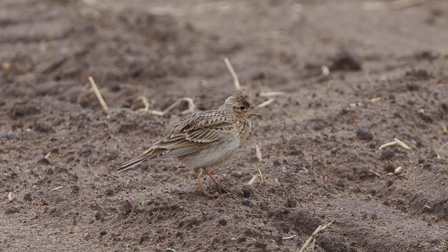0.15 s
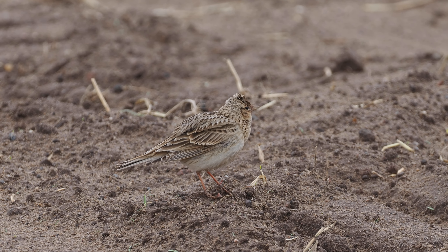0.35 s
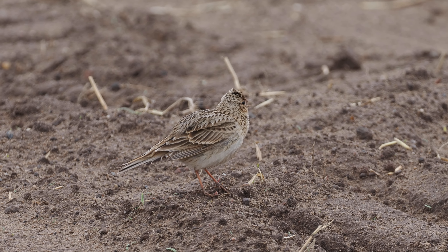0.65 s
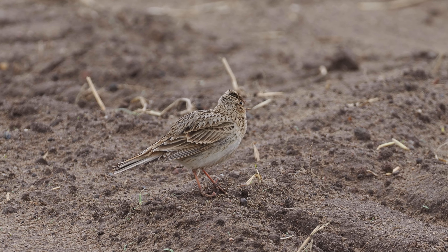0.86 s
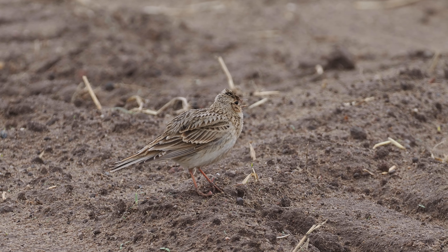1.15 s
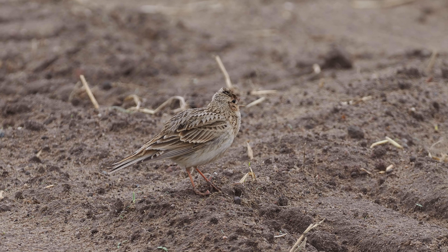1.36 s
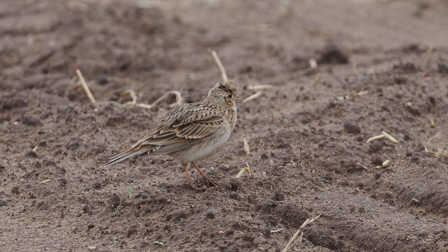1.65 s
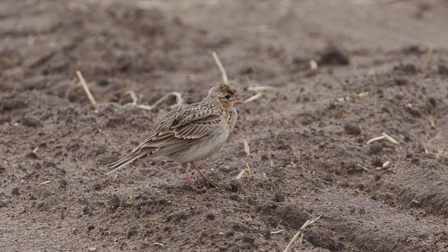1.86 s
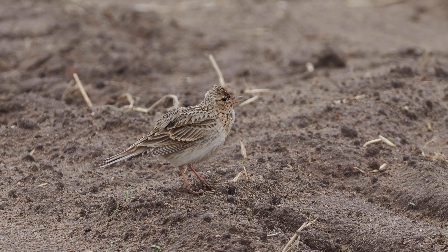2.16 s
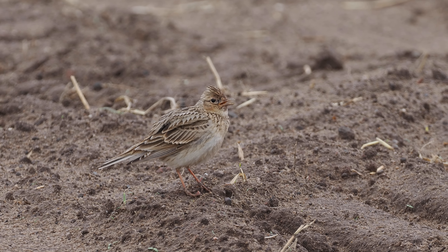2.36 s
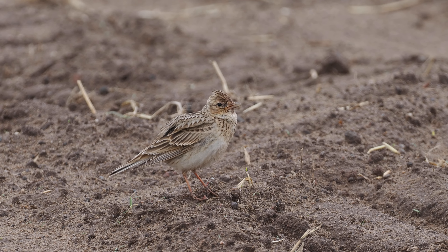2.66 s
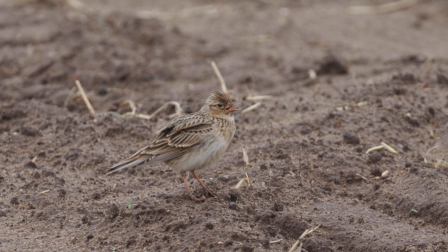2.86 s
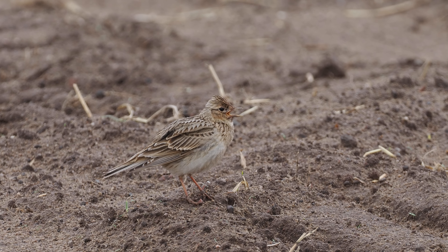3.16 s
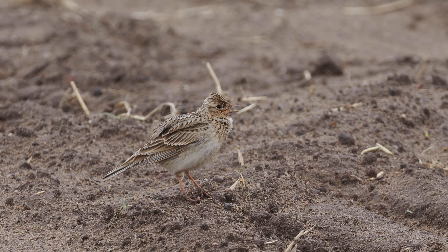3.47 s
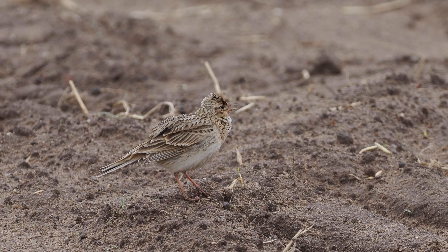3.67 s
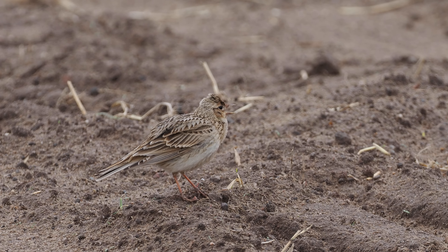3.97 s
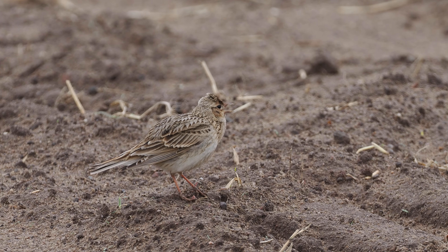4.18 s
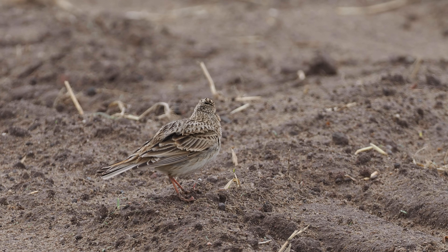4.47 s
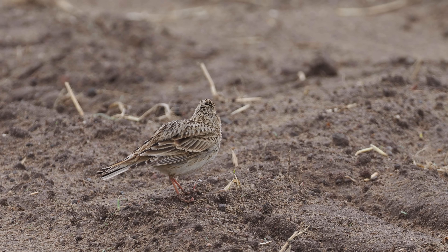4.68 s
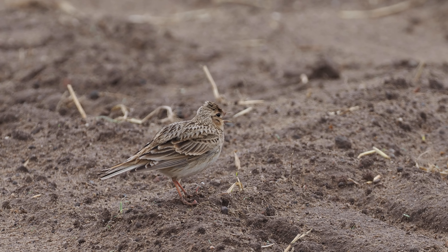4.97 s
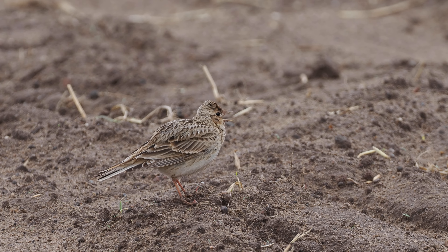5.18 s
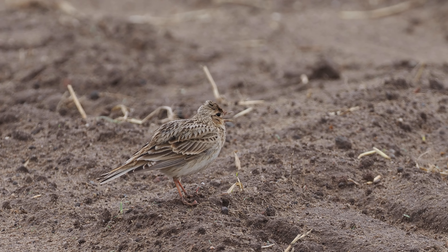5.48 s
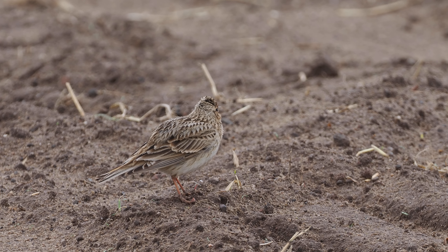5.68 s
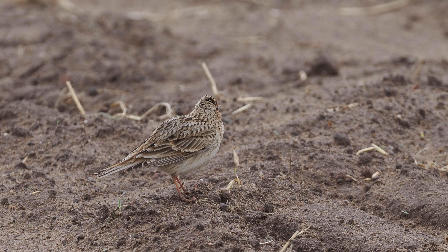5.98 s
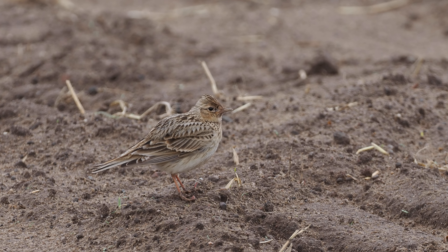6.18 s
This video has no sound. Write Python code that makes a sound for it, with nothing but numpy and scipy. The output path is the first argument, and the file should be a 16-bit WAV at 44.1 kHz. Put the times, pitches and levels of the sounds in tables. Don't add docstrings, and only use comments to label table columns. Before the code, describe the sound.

A gust rumbles as a thin whistle slides down, then a skylark chatters almost without pause: trills, stepped chirps, churrs, harsh buzzes, swooping notes and repeated sweet whistles. The bird is central and fairly dry, with only a faint short ground echo. Uneven low wind bumps hit mainly the right side, a far machine-like roar lies below, and the last moments are wind alone.

```python
import sys
import numpy as np
from scipy import signal
from scipy.fft import rfft, irfft
from scipy.io import wavfile
from scipy.ndimage import uniform_filter1d

SR = 44100
rng = np.random.default_rng(int(sys.argv[2]) if len(sys.argv) > 2 else 0)


def amplitude_ratio(level_db):
    exponent = np.asarray(level_db, float) / 20
    return 10 ** exponent


def generate_wav(sig):
    pcm = np.round(np.clip(np.atleast_2d(sig).T, -1, 1) * 32767).astype(np.int16)
    wavfile.write(sys.argv[1], SR, pcm)


N = 279148

# (frequency [Hz], gain [dB])
BREATH_GAIN = [(3000, -47), (5200, -36), (6400, -31.5), (7300, -6.5), (8000, -8), (8800, -36.5),
               (10500, -30.5), (15000, -42.5)]


def lark():
    calls = glides() + trill() + hooks() + slide() + stepped_calls() + churrs() + dips() + buzzes()
    calls += swoops() + arches() + single_notes() + waves()
    song = np.zeros(N, complex)
    for s, sound in calls:
        add(song, s, sound)
    gain = amplitude_ratio(read(BREATH_GAIN, np.fft.rfftfreq(N, 1 / SR)))
    return song.real + irfft(rfft(song.imag) * gain, N)


# (frequency [Hz], gain [dB])
BEAK_GAIN = [(5000, -19.5), (6200, -33), (7400, -17.5), (8000, -22.5), (8700, -52.5), (9600, -38.5),
             (12000, -29.5), (15000, -35.5)]


def syrinx(hz, third_db=-12, under_db=-42, breath_db=-12):
    haste = np.clip(abs(np.gradient(hz)) * SR / 60000, .03, 1)
    rasp, rasp_ms = 0.019, 0.85
    wobble = evened(uniform_filter1d(rng.standard_normal(len(hz)), size=round(rasp_ms * SR / 1000)))
    phase = 2 * np.pi * (np.cumsum(hz * (1 + rasp * haste * wobble)) / SR + rng.random())
    second = amplitude_ratio(read(BEAK_GAIN, 2 * hz)) * np.sin(2 * phase)
    third = amplitude_ratio(read(BEAK_GAIN, 3 * hz) + third_db) * (3 * hz < SR / 2) * np.sin(3 * phase)
    under_third = amplitude_ratio(read(BEAK_GAIN, 3 * hz / 2) + 12.5) * np.sin(3 * phase / 2)
    under = amplitude_ratio(under_db) * (np.sin(phase / 2) + under_third)
    breath = amplitude_ratio(breath_db) * haste * rng.standard_normal(len(hz))
    return np.sin(phase) + second + third + under + 1j * breath


def note(s, ms, in_hz, out_hz, db, under_db=-42, breath_db=-12, edge_ms=7, soft=0.82):
    edge = min(soft * ms, edge_ms)
    t = np.arange(-edge / 3, ms + edge / 3, 1000 / SR)
    rise = np.clip(np.minimum(t - t[0], t[-1] - t) / edge, 0, 1)
    hz = in_hz + (out_hz - in_hz) * np.clip(t / ms, -.15, 1.15)
    voice = syrinx(hz, under_db=under_db, breath_db=breath_db)
    return s - edge / 3000, amplitude_ratio(db) * np.sin(np.pi / 2 * rise) ** 2 * voice


def figure(s, hz, db, shape, under_db=-42, breath_db=-10, edge_ms=7):
    out = np.zeros(5500, complex)
    lead = .015
    for ms, length, enter, leave, rel_db in shape:
        below_db = under_db if 1.7 < enter + leave < 2.5 else -42
        level = db + rel_db + rng.normal(0, 1.0)
        add(out, *note(ms / 1000 + lead, length, enter * hz, leave * hz, level, below_db, breath_db, edge_ms))
    return s - lead, out


def fluttered(s, hz, db, depth, rate_hz, swing, wobble):
    t = np.arange(s[0], s[-1], 1 / SR)
    hz, db, depth, swing = (np.interp(t, s, c + 0 * s) for c in (hz, db, np.clip(depth, 0, 1), swing))
    drift = evened(uniform_filter1d(rng.standard_normal(len(t)), size=150))
    beat = 2 * np.pi * np.cumsum(rate_hz * (1 + wobble * (1 - depth) * drift)) / SR
    flow = (1 + depth * np.cos(beat)) / np.sqrt(1 + depth ** 2 / 2)
    begun = .004 * (s[0] == 0)
    ends = np.clip(np.minimum(t + begun - t[0], t[-1] - t) / 0.0024, 0, 1)
    voice = syrinx(hz * (1 + swing * (1 - 0.89 * depth) * np.sin(beat)), under_db=-45, breath_db=-19.0)
    return s[0], np.sqrt(2) * amplitude_ratio(db) * flow * ends * voice


def stroke(s, ms, hz, db):
    t = np.arange(ms[0], ms[-1], 1000 / SR)
    hz, db = (uniform_filter1d(np.interp(t, ms, c), size=40) for c in (hz, db))
    return s + ms[0] / 1000, amplitude_ratio(db) * signal.windows.tukey(len(t), .15) * syrinx(hz)


def run_of(s, gap_ms, first_db, last_db, count):
    return zip(s + np.arange(count) * gap_ms / 1000, np.linspace(first_db, last_db, count))


# (time [s], pitch [Hz], rms level [dB])
GLIDE_COURSES = [
    [(0, 4884, -26), (.022, 4860, -24.5), (.046, 4650, -26.5), (.074, 4450, -31.5), (.126, 4259, -33),
     (.154, 4180, -38.5), (.26, 3942, -40), (.335, 3796, -53)],
    [(4.665, 3097, -58), (4.68, 3040, -49), (4.695, 3120, -56), (4.713, 3174, -39), (4.749, 3930, -50),
     (4.775, 4315, -28.5), (4.79, 4200, -34)],
    [(5.047, 5516, -29), (5.077, 5560, -30.5), (5.095, 5810, -35), (5.111, 6110, -35), (5.125, 5900, -58)],
]
GLIDE_FLUTTER = [.01, 0.1, 0.074]


def glides():
    calls = [note(4.788, 13.0, 4250, 3200, -35)]
    for rows, depth in zip(GLIDE_COURSES, GLIDE_FLUTTER):
        s, hz, db = np.transpose(rows)
        calls.append(fluttered(s, hz, db, depth + 0 * s, rate_hz=220, swing=0.046 * depth, wobble=0.27))
    return calls


# (time [s], peak level [dB])
TRILL_SWEEPS = [
    (0.4671, -34.5),
    (.484, -33.5),
    (0.5048, -30.5),
    (0.525, -27.5),
    (.5475, -26.5),
    (.57, -27.5),
    (0.5923, -26),
    (.6146, -25.5),
    (0.637, -26),
    (0.6595, -28.5),
]


def trill():
    high_hz, low_hz, end_hz, sink_s = 6280, 5345, 4600, 0.109
    first_ms, fill = 5.9, .56
    s, db = np.transpose(TRILL_SWEEPS)
    sunk = np.clip((s - s[0]) / sink_s, 0, 1)
    ms = np.append(first_ms, 1000 * fill * np.gradient(s)[1:])
    top_hz = high_hz + (low_hz - high_hz) * sunk
    calls = []
    for at, length, top, level in zip(s, ms, top_hz, db):
        calls += [note(at, length, top, end_hz, level + 0.5, breath_db=-7.5, edge_ms=8.3),
                  note(at + length / 1000, 6.6, end_hz, 0.82 * end_hz, level - 15)]
    return calls


# (offset [ms], length [ms], pitch in [factor], pitch out [factor], level [dB])
HOOK_SHAPE = [(-0.64, 2.8, 1.71, 1.23, 0), (1.2, 7.5, 0.99, 1.08, -9.5)]
# (first time [s], gap [ms], first level [dB], last level [dB])
HOOK_PACE = (.7213, 12.6, -33.5, -30.5)


def hooks():
    return [figure(s, 3190, db, HOOK_SHAPE) for s, db in run_of(*HOOK_PACE, count=6)]


# (time [s], peak level [dB])
SLIDE_PULSES = [(.844, -40), (.8508, -35), (.8592, -33.5), (.868, -33), (0.878, -34.5), (.888, -27.5),
                (0.9017, -24.5), (.9176, -27), (0.9356, -27.5), (0.9516, -29), (0.97, -31.5), (.9865, -35),
                (1.0054, -34.5), (1.0232, -37), (1.0427, -44)]
# (time [s], pitch [Hz], extra fall within a pulse [Hz])
SLIDE_COURSE = [(.844, 5430, 350), (.854, 5870, 600), (.88, 5700, 400), (0.906, 5290, 280),
                (.945, 4780, 150), (.99, 4360, 100.4), (1.056, 4000, 100)]


def slide():
    fill = 0.83
    s, db = np.transpose(SLIDE_PULSES)
    gap = np.diff(s)
    length = fill * np.append(gap, gap[-1])
    at, hz, fall = np.transpose(SLIDE_COURSE)
    half = np.interp(s, at, fall) / 2
    in_hz, out_hz = np.interp(s, at, hz) + half, np.interp(s + length, at, hz) - half
    calls = []
    for s, length, in_hz, out_hz, db in zip(s, length, in_hz, out_hz, db):
        calls += [note(s, 1000 * length, in_hz, out_hz, db, breath_db=-16, edge_ms=2.97),
                  note(s + length, 3.5, out_hz, 0.84 * out_hz, db - 10.0)]
        if s > 1:
            calls += [note(s, 2.93, 1.04 * in_hz, 0.955 * in_hz, db + 5.5)]
    return calls


# (time [s], pitch [Hz], peak level [dB])
STEP_CALLS = [
    (1.108, 5150, -32),
    (3.077, 4894, -27.5),
    (3.2077, 4800, -26),
    (3.342, 4964, -25.5),
]
# (offset [ms], length [ms], pitch in [factor], pitch out [factor], level [dB])
STEP_SHAPE = [(8, 1.7, 0.89, 1.12, -11), (18.5, 2.2, 1.13, 0.76, -8), (9.5, 4.5, 1.4, 1.57, -12),
              (19.5, 3.6, 1.4, 1.47, -13.5), (0, 4.2, 0.88, 1.19, 0), (11, 3, .85, 0.73, -5.5),
              (19.5, 9, 0.65, .74, -15), (31, 13, 0.638, 0.649, -15), (30, 4.6, 1.17, 1.42, -14),
              (44.5, 5.2, 1.07, 1.185, -1.5), (49, 7.2, 1.15, 1.174, -6.5), (62, 14.4, 1.02, 0.981, -2),
              (82, 11.2, .91, 0.842, -9.5)]


def stepped_calls():
    return [figure(*row, STEP_SHAPE, under_db=-12.5, edge_ms=3.52) for row in STEP_CALLS]


# (time [s], level [dB], link pitch [Hz], link level [dB])
CHURR_CALLS = [
    (1.25, -32.5, 3250, -36.5),
    (1.4008, -32, 3220, -33),
    (1.562, -29.5, 3340, -31),
    (1.7229, -26.5, 3330, -35),
    (1.891, -23, 3880, -35),
    (2.074, -27.5, 3220, -31),
    (2.7693, -16, 3530, -32),
    (2.9165, -21.5, 4110, -29),
    (3.4812, -23, 3620, -35),
    (3.6434, -24.5, 3920, -42),
]
# (offset [ms], length [ms], pitch in [factor], pitch out [factor], level [dB])
RATTLE_SHAPE = [(-2, 4.2, 0.957, 1.051, 2), (4.5, 2.6, 1.147, 0.9, -5.5)]
LAST_RATTLE_SHAPE = [(-2, 5.4, .97, 0.98, 1.5), (5.5, 3.2, 1.08, 0.87, -5), (9.5, 2.8, .86, .74, -8)]


def churrs():
    gap_s, rattle_hz = .0116, 4388
    rattles = ((-5, RATTLE_SHAPE), (0, RATTLE_SHAPE), (-0.5, LAST_RATTLE_SHAPE))
    calls = []
    for s, db, link_hz, link_db in CHURR_CALLS:
        for k, (rel_db, shape) in enumerate(rattles):
            calls.append(figure(s + k * gap_s, rattle_hz, db + rel_db, shape))
        calls.append(note(s + .0345, 3.8, .95 * link_hz, 1.04 * link_hz, link_db))
    return calls


# (time of the fall [s], rebound pitch [Hz], fall level [dB], rebound level [dB])
DIP_CALLS = [(1.2976, 3300, -46, -36), (1.3157, 3210.0, -37, -36), (1.334, 3160, -36, -35.5),
             (1.353, 2810, -32, -40), (1.448, 3300, -39.5, -33), (1.4637, 2950, -35, -30),
             (1.483, 2700, -34, -34.1), (1.501, 2710.0, -32.7, -34), (1.5207, 2930.0, -41, -53.0),
             (1.6143, 3200, -35, -32.5), (1.6323, 2790, -35, -33), (1.651, 2700, -32, -31),
             (1.671, 2710, -31.5, -36.5), (1.7678, 3330, -40, -32.5), (1.7843, 3150, -33.2, -31.1),
             (1.8028, 2730, -30.1, -32), (1.822, 2820, -30, -29), (1.8398, 2660.0, -44, -55),
             (1.9373, 3230.0, -37, -31.5), (1.9536, 2870, -32, -30), (1.971, 2700, -30, -30.5),
             (1.9907, 2570.0, -31.6, -31.1), (2.0113, 2530, -37, -34), (2.1217, 3132, -34, -31.6),
             (2.1377, 2840, -33.4, -30.5), (2.1552, 2795, -32.6, -31.5), (2.1744, 2730, -33, -28.5),
             (2.1927, 2770, -33, -32.1), (2.8173, 3120, -31.6, -34.1), (2.8361, 2670, -31, -30.5),
             (2.855, 2680.0, -30, -30.6), (2.873, 2560.0, -35.8, -58), (2.9625, 3220, -37, -34.9),
             (2.9795, 2850, -34, -31), (2.9992, 2695, -35, -31.5), (3.0202, 2770, -30, -31),
             (3.039, 2720.0, -36.9, -51), (3.5296, 2910, -32, -32), (3.5469, 2790, -29, -29),
             (3.5654, 2750.0, -30, -27), (3.5848, 2743, -29, -29), (3.6026, 2970, -41.1, -51.5),
             (3.688, 3280, -39, -31.2), (3.7036, 2810, -34.2, -30.5), (3.7227, 2800.0, -33, -31),
             (3.7411, 2744, -31.5, -30)]


def dips():
    floor_hz, span_hz = 2700, 520
    calls = []
    for s, hz, fall_db, up_db in DIP_CALLS:
        lift = np.clip((hz - floor_hz) / span_hz, 0, 1)
        crest_hz = 3120 + 0.53 * (hz - floor_hz)
        up = s + 0.0053 - 0.0027 * lift
        calls += [note(s - .0042, 1.6, 4500, 3500, fall_db - 14),
                  note(s - .0018, 2.7, 3300, 2270, fall_db),
                  note(up - .0018, 1.9, 1950, 2550, up_db - 9.5),
                  note(up, 4.3, 2415, crest_hz, up_db - 2.3 * lift),
                  note(up + 0.0038, 4.9 + 5.1 * lift, crest_hz, 0.968 * crest_hz, up_db - 11.5 + 7 * lift)]
    return calls


# (time [s], length [s], rms level [dB])
BUZZ_CALLS = [
    (2.245, 0.12, -21),
    (2.416, 0.13, -21),
    (2.59, 0.13, -20.5),
]
# (share of length [0-1], pitch [Hz], level [dB], flutter depth [0-1])
BUZZ_COURSE = [(0, 4600, -17.5, 0.71), (0.119, 4950, -2, .75), (.32, 4650, -1, .75), (.48, 4000, -10, 0.65),
               (.6, 3250, -17, .4), (.8, 2700, -18, .4), (.995, 2550, -19, 0.46)]


def buzzes():
    share, hz, rel_db, depth = np.transpose(BUZZ_COURSE)
    return [fluttered(s + share * length, hz, db + rel_db, depth, rate_hz=287, swing=-.15, wobble=0.32)
            for s, length, db in BUZZ_CALLS]


# (time [s], length [s], rms level [dB])
SWOOP_CALLS = [
    (3.821, 0.042, -25),
    (4.836, 0.085, -24),
    (5.157, 0.073, -21),
]
# (share of length [0-1], pitch [Hz], level [dB], flutter depth [0-1])
SWOOP_COURSE = [(0, 6300, -28, 0.85), (.2, 6390, -17, .9), (.55, 6090, -16, 0.71), (.66, 5770, -9, 0.089),
                (.78, 5250, 1.5, .01), (.87, 4600, -12, .01), (.995, 3500, -23, .01)]


def swoops():
    share, hz, rel_db, depth = np.transpose(SWOOP_COURSE)
    return [fluttered(s + share * length, hz, db + rel_db, depth, rate_hz=210, swing=-.17 * depth, wobble=1.5)
            for s, length, db in SWOOP_CALLS]


# (time of the tip [s], pitch [Hz], level [dB])
ARCH_CALLS = [(3.868, 4890, -24.5), (3.8795, 4850, -26), (3.891, 4900, -21.5), (3.901, 4930, -22.5),
              (3.912, 4850, -26), (4.935, 4600, -30), (4.946, 4600, -28.5), (4.957, 4600, -28.5),
              (4.968, 4540, -35), (5.234, 4920, -33.5), (5.2457, 4900, -26.5), (5.256, 5070, -24.5),
              (5.268, 5060, -24.5), (5.279, 5000, -24)]
# (offset [ms], pitch [factor], level [dB])
ARCH_COURSE = [(-5, .8, -25), (-3.5, .92, -4), (-1.5, 0.994, 1), (-1, 1.13, -11), (2, 1.016, 2.5),
               (3, 0.89, -8), (3.6, 0.745, -16), (3.5, 0.687, -11), (8, 0.7, -21.5)]


def arches():
    ms, factor, rel_db = np.transpose(ARCH_COURSE)
    return [stroke(s, ms, hz * factor, db + rel_db) for s, hz, db in ARCH_CALLS]


# (time [s], length [ms], pitch in [Hz], pitch out [Hz], peak level [dB])
WHISTLE_NOTES = [(3.9537, 22.9, 4990, 4600, -21.5), (3.9992, 27.1, 4930, 4686, -23.5),
                 (4.0439, 28.7, 4910, 4675, -22.5), (4.088, 29.2, 4880, 4645, -24),
                 (4.1312, 33, 4790, 4674, -26.5), (5.3357, 24.8, 4850, 4450, -34),
                 (5.38, 25.6, 4800, 4670, -28), (5.423, 28.3, 4777, 4660, -26),
                 (5.4685, 25.1, 4820, 4670, -25), (5.5156, 25.5, 4850, 4710, -24.5),
                 (5.5598, 31.9, 4730, 4640, -31), (5.607, 29.6, 4640, 4490.0, -35.5)]
CHIP_NOTES = [(4.5194, 3.5, 5010, 5620, -27), (4.5394, 2.5, 5850, 4370, -25.5),
              (4.5417, 5.0, 4830, 5800, -18), (4.5472, 2.2, 5820, 4530, -15.5),
              (4.5521, 5.8, 4720, 5700, -19), (4.5925, 3.0, 5060, 5670, -21),
              (4.6067, 1.9, 5330, 5870, -24), (4.615, 3.2, 6200, 4440.0, -18),
              (4.617, 4.5, 4960, 5860, -15.5), (4.6234, 2.2, 5680, 4400, -20), (4.6273, 5, 4850, 5640, -21),
              (4.923, 4.6, 5210, 3600, -36), (5.0214, 2.7, 5360, 5030, -22.5),
              (5.0369, 3.3, 5900, 4920, -22), (5.0406, 5.7, 5210.0, 5640, -19.5)]
WARBLE_NOTES = [
    (4.2238, 11.2, 4660, 4460, -30),
    (4.2386, 12.4, 3110, 3220, -32.5),
    (4.252, 7.2, 4200, 4500, -32),
    (4.2575, 3, 4200, 2700, -36),
    (4.2495, 3, 3350, 4200, -40),
    (4.265, 11, 2950, 3180, -34.5),
    (4.2765, 2.2, 3260, 4200, -40),
    (4.2785, 6, 4270, 4430, -37),
    (4.2838, 2.4, 4050, 2530, -32),
    (4.289, 13, 2800, 2980, -40),
]


def single_notes():
    return [note(*row) for row in WHISTLE_NOTES + CHIP_NOTES + WARBLE_NOTES]


# (offset [ms], length [ms], pitch in [factor], pitch out [factor], level [dB])
WAVE_SHAPE = [(-11, 5, .74, 1, -0.5), (-4.5, 7, 0.83, 0.99, -0.5), (1, 2, 0.89, 0.64, 2),
              (6, 3.1, 0.68, .7, -3), (7.5, 8.8, 0.704, 0.7, -2)]
# (first time [s], gap [ms], first level [dB], last level [dB])
WAVE_PACE = (4.3075, 27, -37, -38)


def waves():
    return [figure(s, 4200 * (1 - 0.017 * k), db, WAVE_SHAPE)
            for k, (s, db) in enumerate(run_of(*WAVE_PACE, count=6))]


def ground(x, t60=0.082, gap=150):
    t = np.arange(6000) / SR
    sign = rng.choice([-1., 1.], (2, 6000))
    sparse = rng.random((2, 6000)) < .08
    taps = sign * sparse * amplitude_ratio(-60 * t / t60) * (t > gap / SR)
    return signal.fftconvolve(x[None], taps / np.linalg.norm(taps[0]), axes=1)[:, :N]


# (time of the peak [s], rms level [dB], time to rise 30 dB [ms], time to fall 30 dB [ms])
GUST_PEAKS = [(0.029, -33, 200.5, 693), (.19, -35.5, 700, 280), (.49, -36.5, 31, 101),
              (0.64, -29.5, 73, 124), (2.19, -31, 154, 83.5), (2.745, -44, 128, 61), (2.88, -51.5, 200, 90),
              (3.391, -42, 31, 88), (3.51, -41.5, 131, 248), (3.585, -46, 200, 30), (3.864, -39, 157, 147),
              (3.921, -38.5, 150, 106), (4.17, -49.5, 300, 701), (4.411, -41, 248, 257),
              (4.599, -34, 93, 247), (4.7, -41, 200, 77), (5.19, -48, 45, 150), (5.29, -34, 267, 200),
              (5.85, -43, 22, 267), (5.979, -36.5, 91.5, 98), (6.13, -44, 430, 79), (6.25, -44.5, 102, 65)]


def wind_db(t):
    s, db, rise_ms, fall_ms = np.transpose(GUST_PEAKS)[..., None]
    drop = 30000 * np.maximum((s - t) / rise_ms, (t - s) / fall_ms)
    return np.maximum((db - drop).max(0), -69)


# (frequency [Hz], level [dB])
CALM_SPECTRUM = [(20, -10), (60, 2.5), (130, -7), (300, -43.5), (900, -71), (2500, -110)]
STORM_SPECTRUM = [(20, -5), (60, 7), (130, -1), (300, -12), (900, -51.5), (2500, -110)]
# (time [s], share [0-1])
LEFT_SHARE = [(3.89, 0.02), (3.915, 0.9), (4.02, 1), (4.06, 0)]


def gusts(calm_db=-56, storm_db=-36, lumpy_db=4.0, port_db=5.0):
    frames, hz = N // 256 + 5, np.fft.rfftfreq(1024, 1 / SR)
    s = np.arange(frames) * 256 / SR
    db = wind_db(s)
    force = np.clip((db - calm_db) / (storm_db - calm_db), 0, 1)
    colour_db = np.outer(read(CALM_SPECTRUM, hz), 1 - force) + np.outer(read(STORM_SPECTRUM, hz), force)
    band = amplitude_ratio(colour_db[(hz > 110) & (hz < 400)])
    a, b = rng.standard_normal((frames, 513, 2)).T
    spectrum = (a + 1j * b) * amplitude_ratio(colour_db) / np.sqrt((band ** 2).sum(0))
    air = signal.istft(spectrum, nperseg=1024, noverlap=768)[1][:N]
    slow = signal.butter(4, 45, fs=SR, output="sos")
    lumps = evened(signal.sosfilt(slow, rng.standard_normal(N)))
    t = np.arange(N) / SR
    air = air * amplitude_ratio(uniform_filter1d(np.interp(t, s, db), size=400) + port_db + lumpy_db * lumps)
    left = np.clip(np.interp(t, *np.transpose(LEFT_SHARE)), 0, 1)
    return air * np.array([np.sqrt(left), np.sqrt(1 - left)])


# (time [s], frequency [Hz], peak level [dB])
EDDIES = [
    (.632, 480, -14),
    (.645, 300, -19),
]


def pops():
    out = np.zeros((2, N))
    for s, hz, db in EDDIES:
        u = np.arange(-3, 3, 2 * hz / SR)
        add(out[1], s - 3 / (2 * hz), -amplitude_ratio(db) * (1 - 2 * u ** 2) * np.exp(-u ** 2))
    return out


# (frequency [Hz], density [dB per Hz])
FIELD_SPECTRUM = [(15, -44.5), (25, 6), (72, -2), (190, -24), (317, -23.5), (624, -24.5), (936, -17.5),
                  (2910, -37), (4490, -41.5), (6210, -47.5), (7710, -42.5), (12200, -48), (16000, -49.5)]
# (frequency [Hz], correlation [-1 to 1])
LIKENESS = [(30, 0.93), (60, 0.99), (130, 0.81), (300, 0.73), (680, 0.79), (1000, 0.52), (1500, 0.5),
            (3000, 0)]
# (frequency [Hz], width [Hz], level over the rumble [dB])
MACHINE_HUMS = [(64.6, 14.7, 4.5), (236.6, 10, 6.5)]


def field():
    frames, hz = N // 512 + 5, np.fft.rfftfreq(2048, 1 / SR)
    a, b, c, d, patches = rng.standard_normal((frames, 1025, 5)).T
    patches = evened(uniform_filter1d(uniform_filter1d(patches, size=16, axis=0), size=8, axis=1))
    same = np.clip(read(LIKENESS, hz), -1, 1)[:, None]
    left = a + 1j * b
    z = np.array([left, same * left + np.sqrt(1 - same ** 2) * (c + 1j * d)])
    hums_db = sum(db * np.exp(-((hz - f) / width) ** 2) for f, width, db in MACHINE_HUMS)
    z *= amplitude_ratio((read(FIELD_SPECTRUM, hz) + hums_db)[:, None] + 0.61 * patches)
    return amplitude_ratio(-40) * evened(signal.istft(z, nperseg=2048, noverlap=1536)[1][:, :N])


def evened(x):
    return x / np.sqrt(np.mean(x ** 2) + 1e-20)


def read(points, hz):
    f, value = np.transpose(points)
    return np.interp(np.log(hz + 1), np.log(f + 1), value)


def add(mix, s, sound):
    part = mix[max(round(s * SR), 0):][:len(sound)]
    part += sound[:len(part)]


def scene():
    song = lark()
    direct = np.array([amplitude_ratio(2.5) * np.roll(song, shift=1), amplitude_ratio(2.0) * song])
    return direct + amplitude_ratio(-8) * ground(song) + field() + gusts() + pops()


def band_limit(x):
    return signal.sosfilt(signal.butter(12, 16250, fs=SR, output="sos"), x)


def record(dry):
    dull = signal.oaconvolve(dry, signal.firwin(511, 15700, fs=SR)[None], "same")
    return band_limit(dull)


dry = scene()
out = record(dry)
generate_wav(out)
```